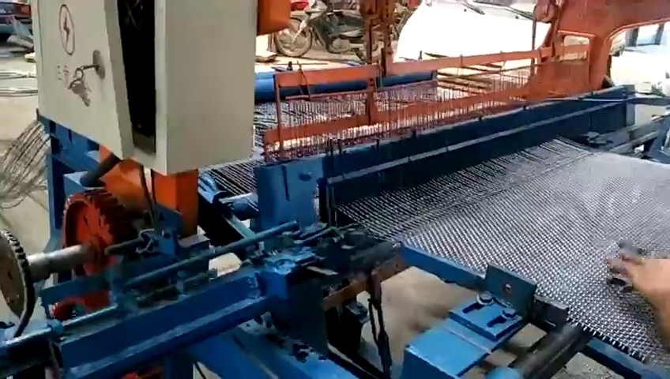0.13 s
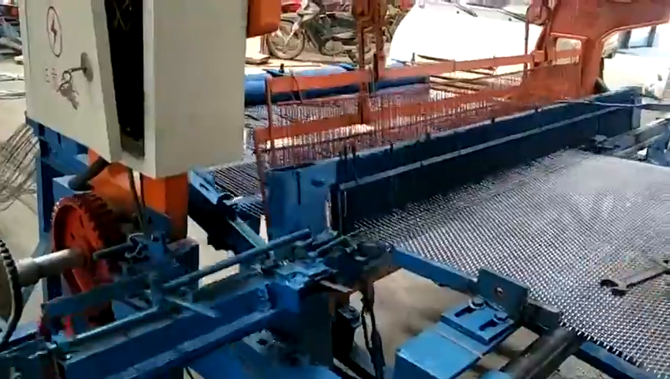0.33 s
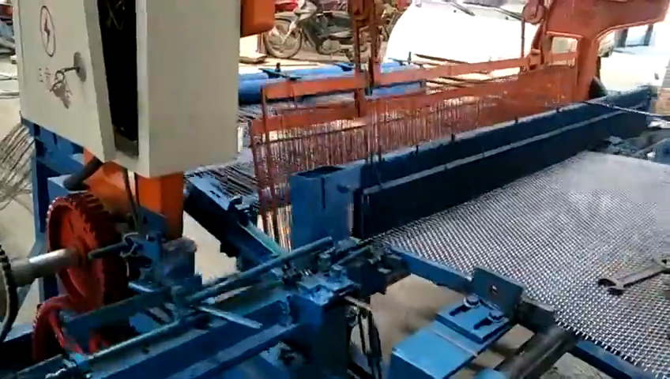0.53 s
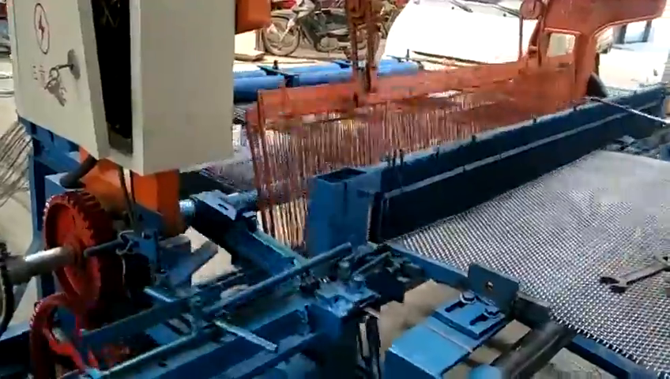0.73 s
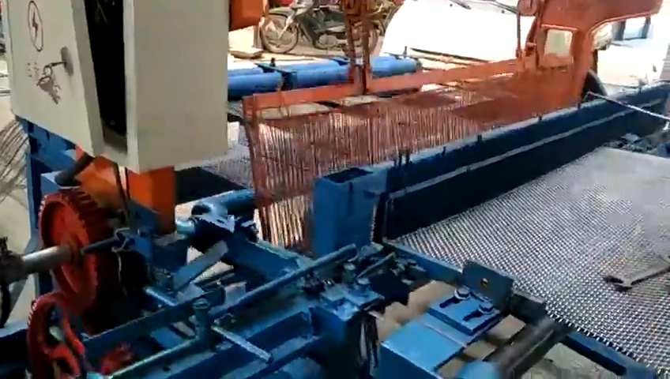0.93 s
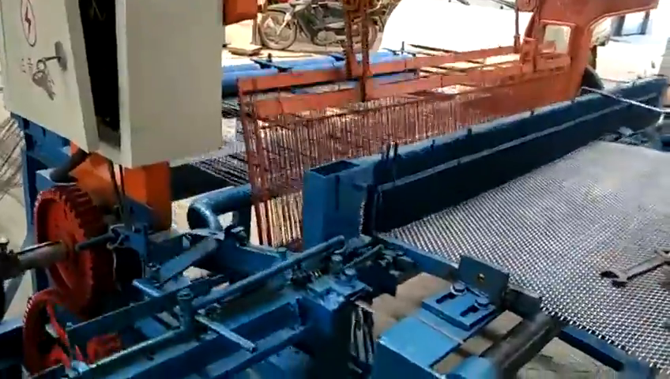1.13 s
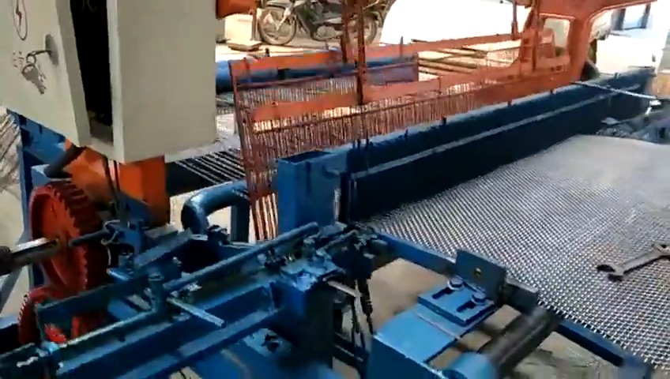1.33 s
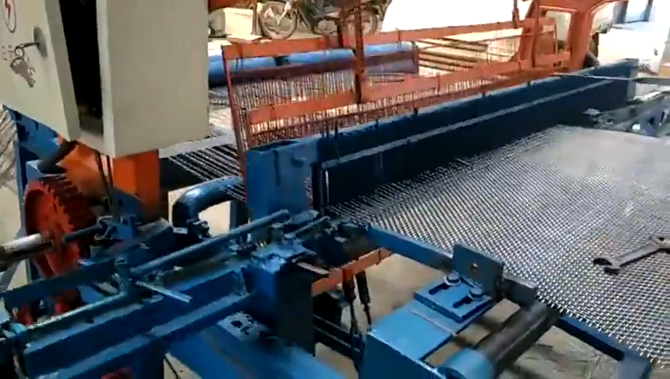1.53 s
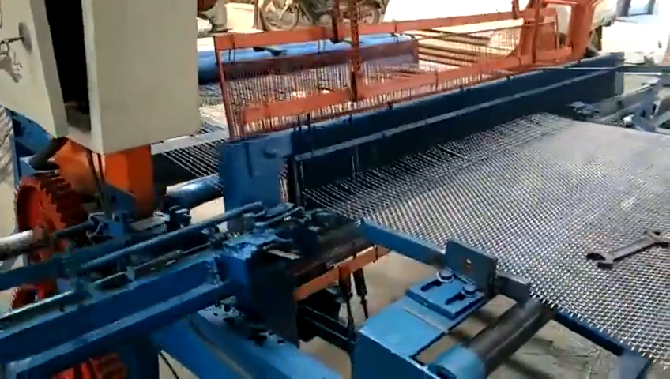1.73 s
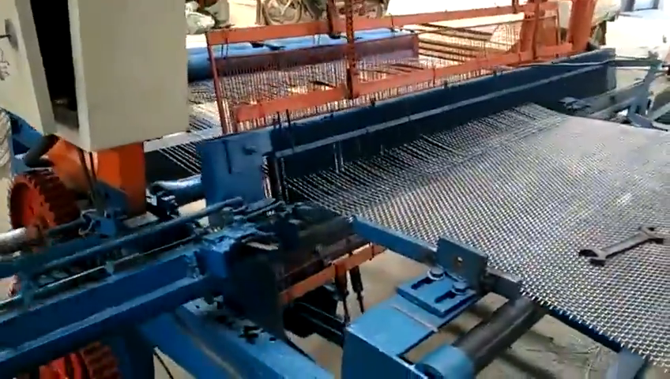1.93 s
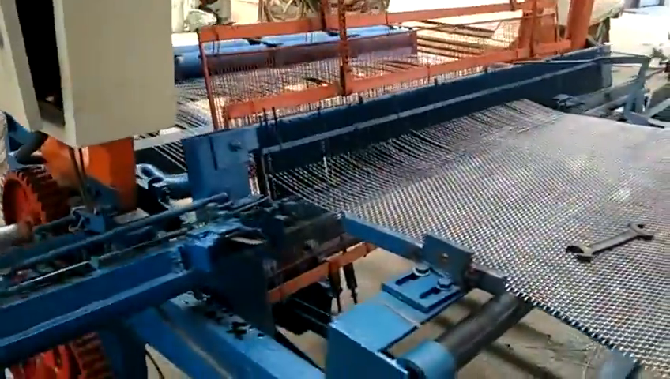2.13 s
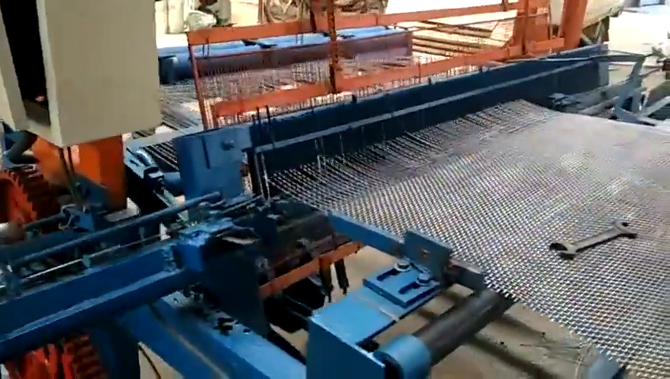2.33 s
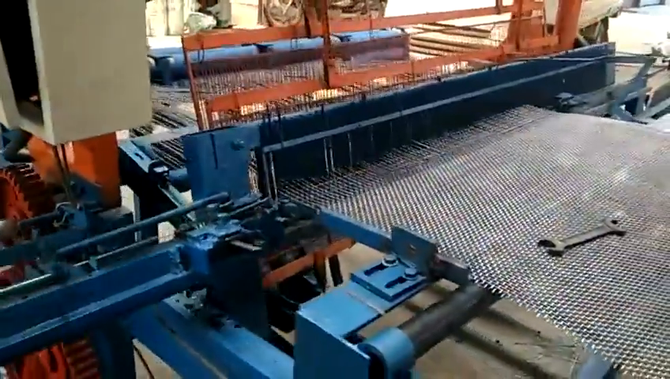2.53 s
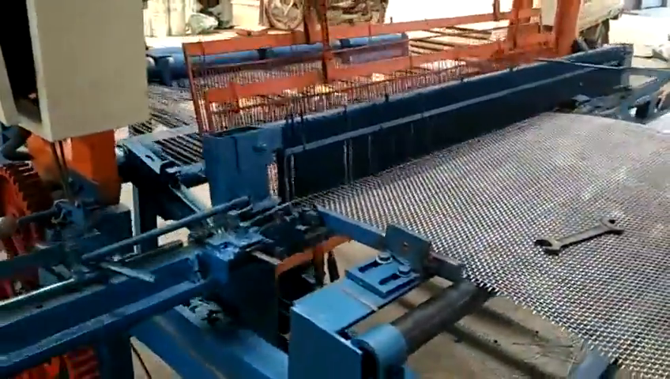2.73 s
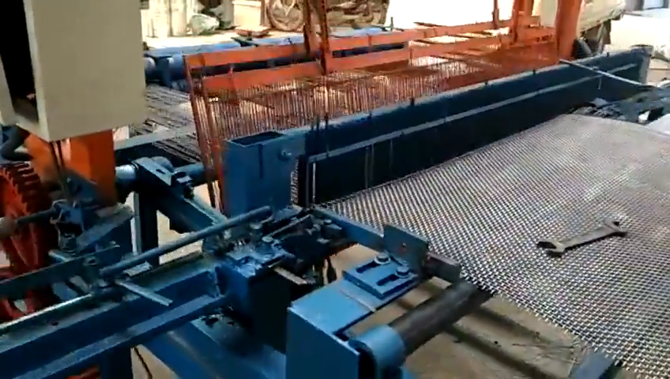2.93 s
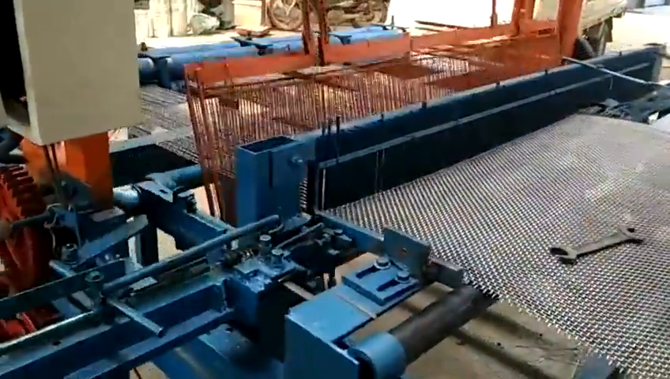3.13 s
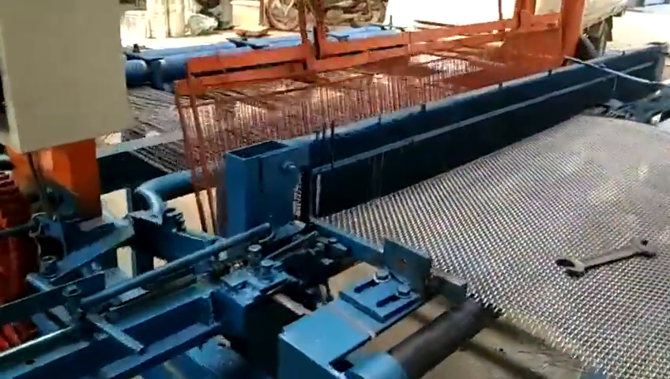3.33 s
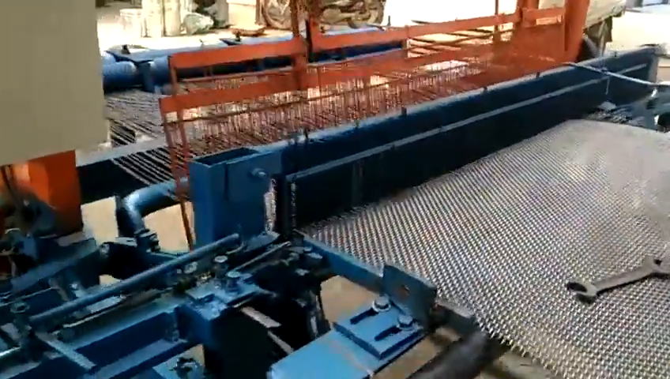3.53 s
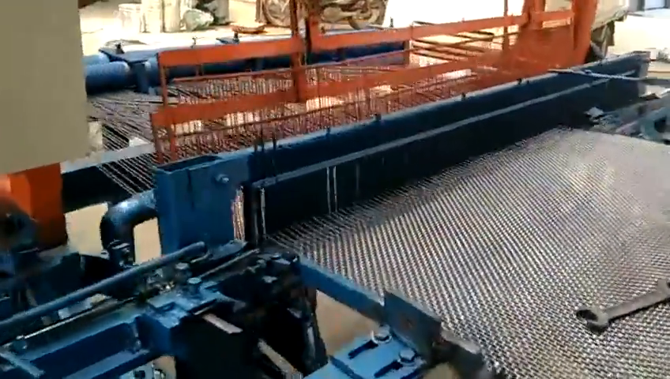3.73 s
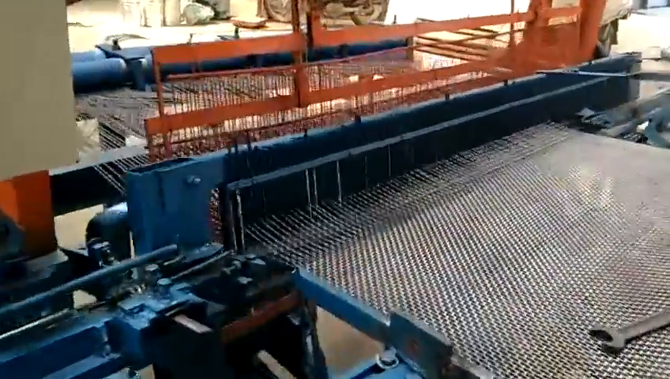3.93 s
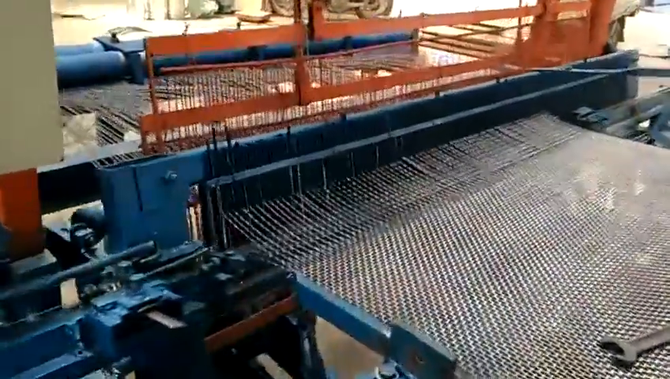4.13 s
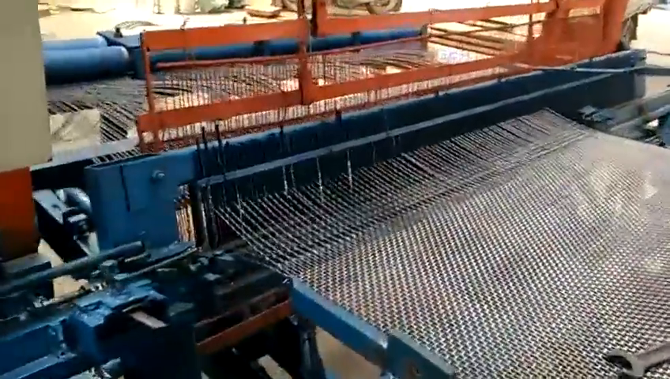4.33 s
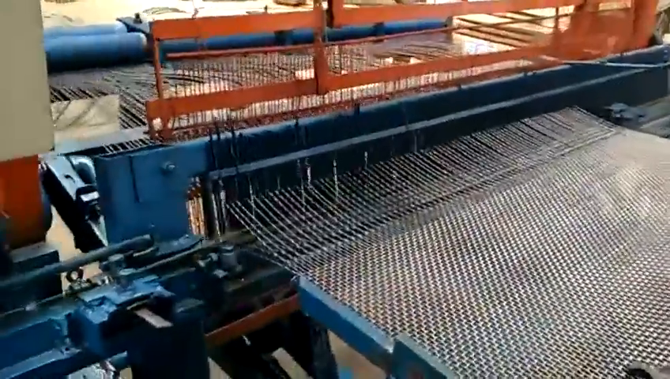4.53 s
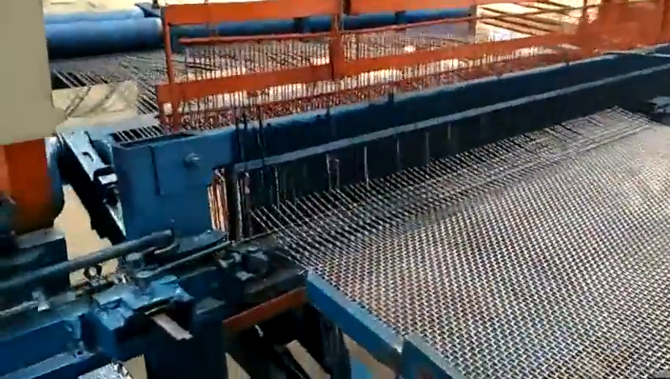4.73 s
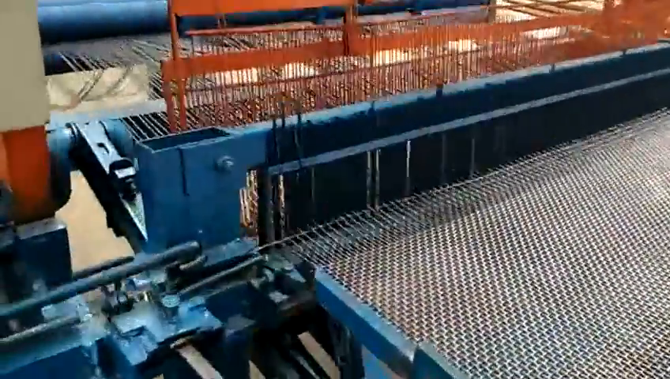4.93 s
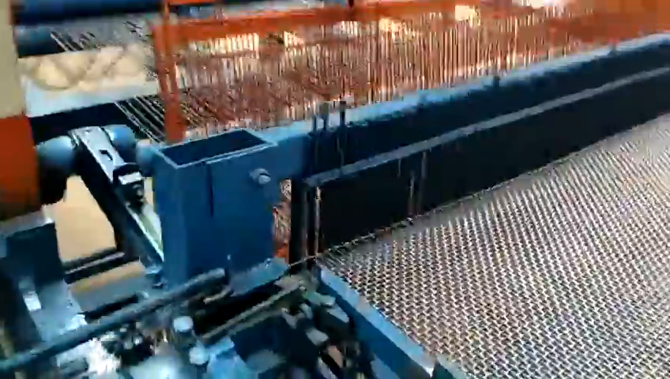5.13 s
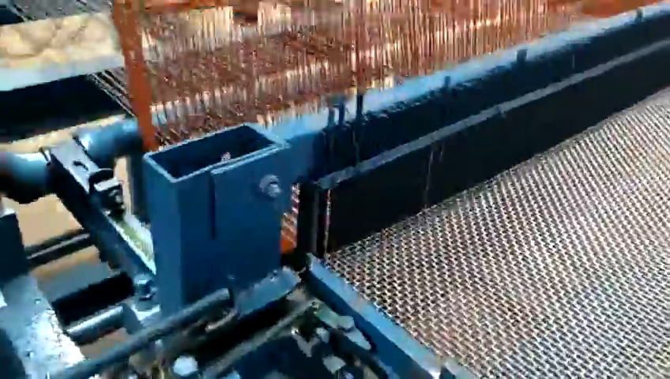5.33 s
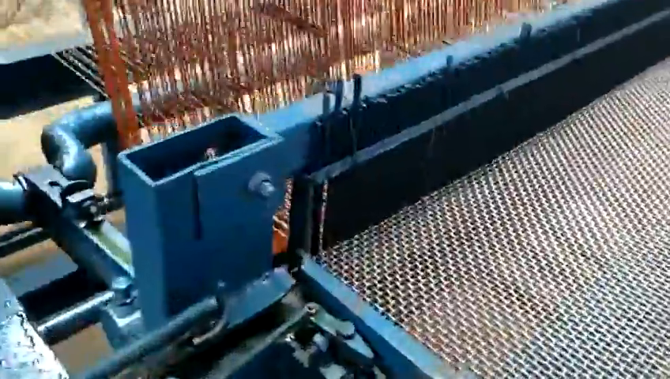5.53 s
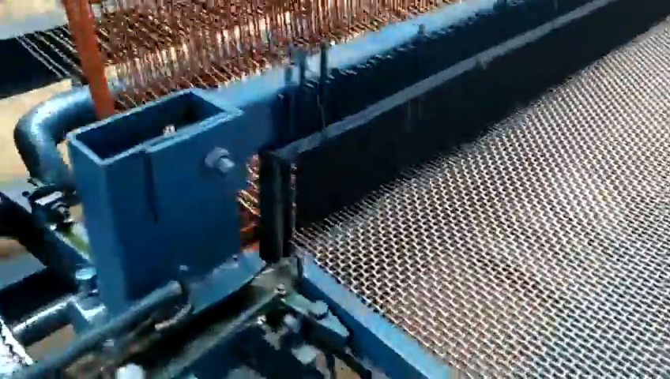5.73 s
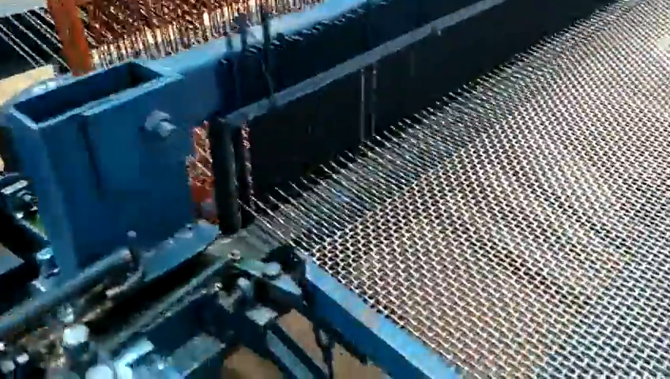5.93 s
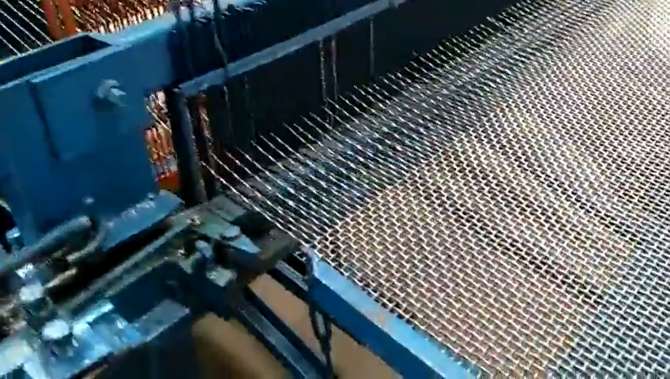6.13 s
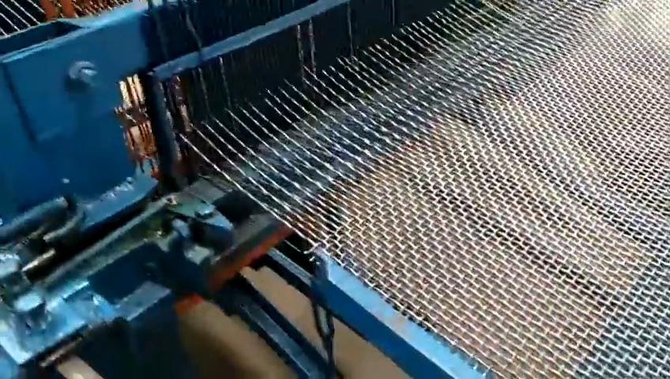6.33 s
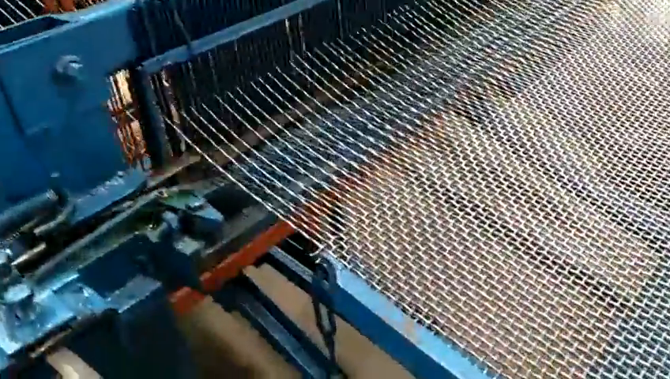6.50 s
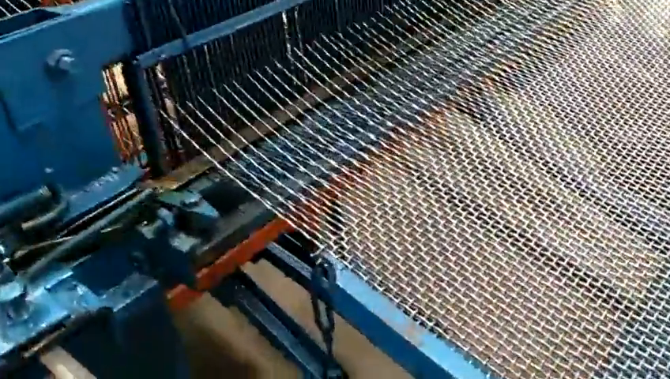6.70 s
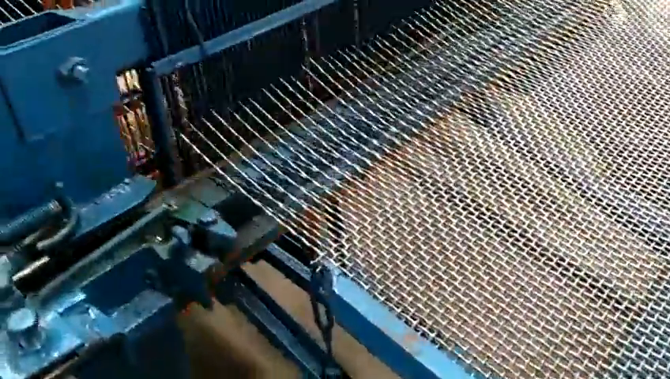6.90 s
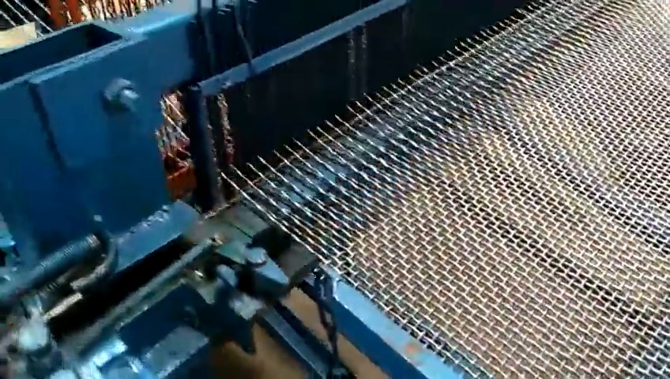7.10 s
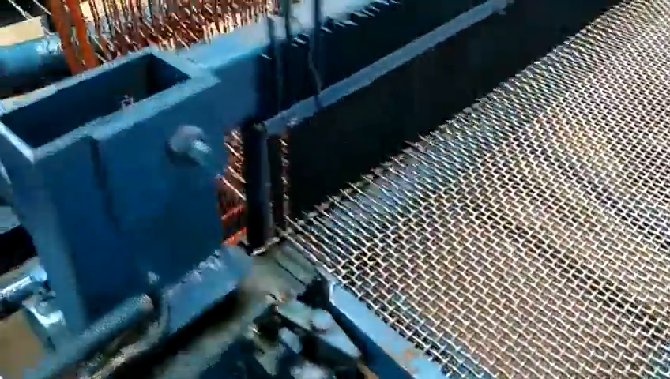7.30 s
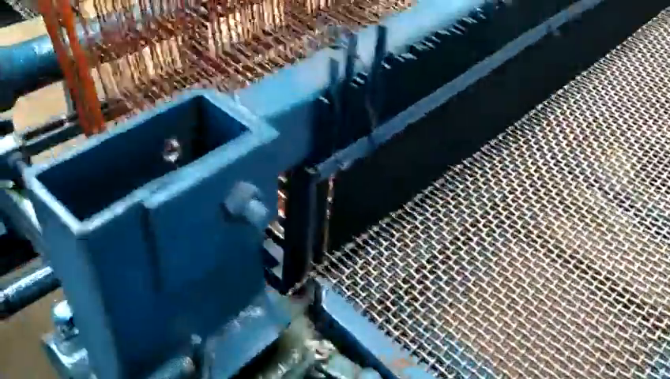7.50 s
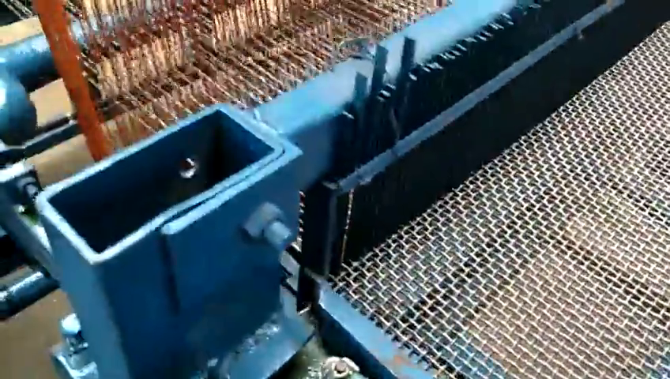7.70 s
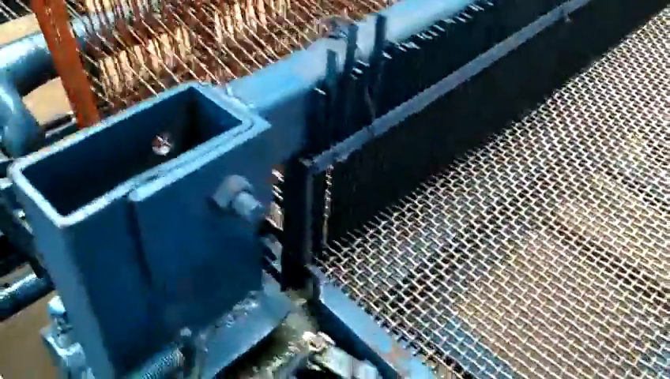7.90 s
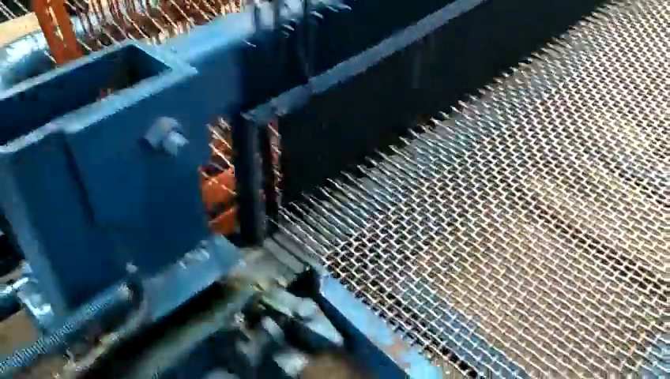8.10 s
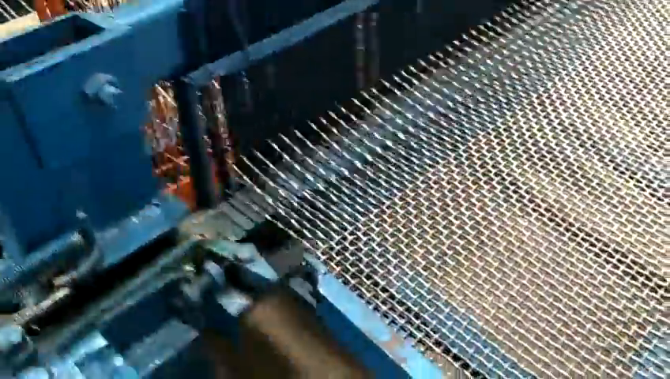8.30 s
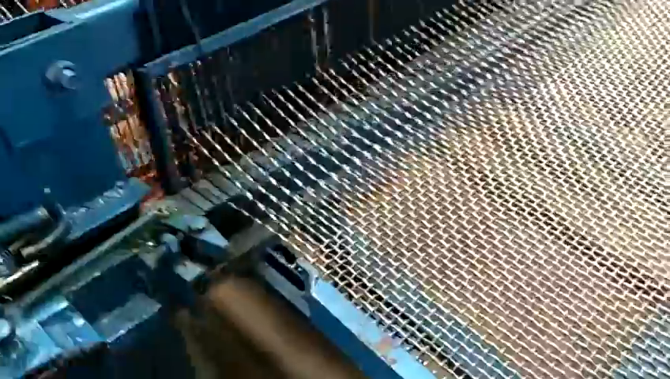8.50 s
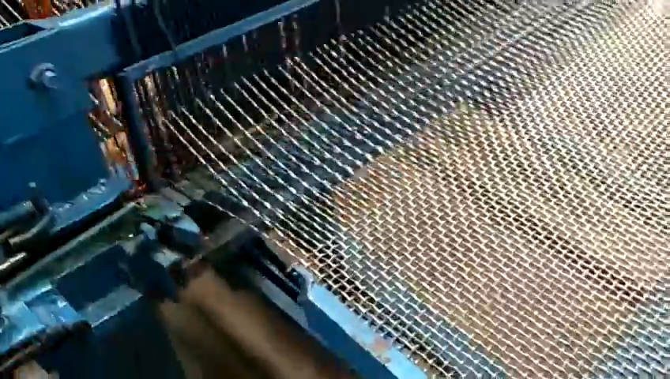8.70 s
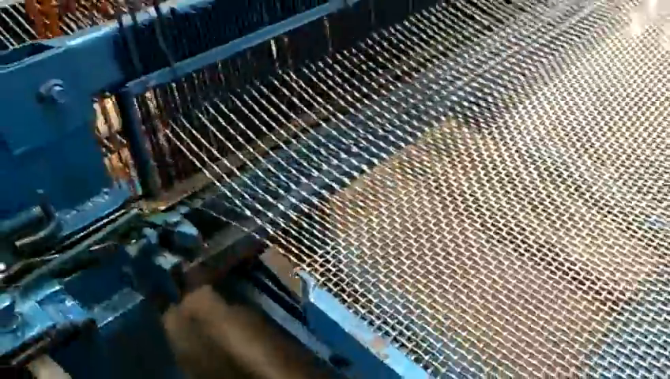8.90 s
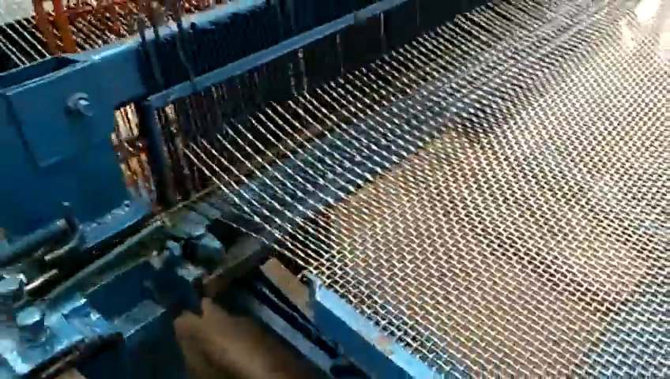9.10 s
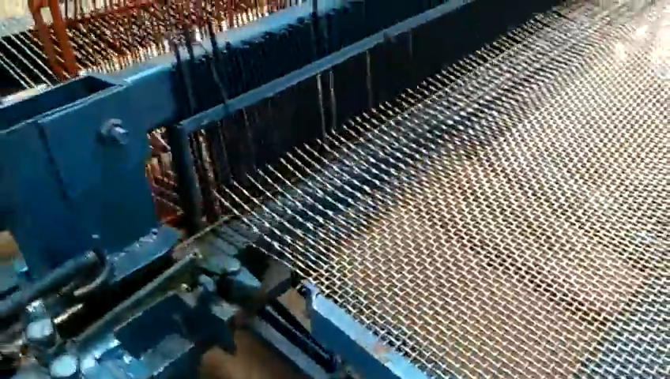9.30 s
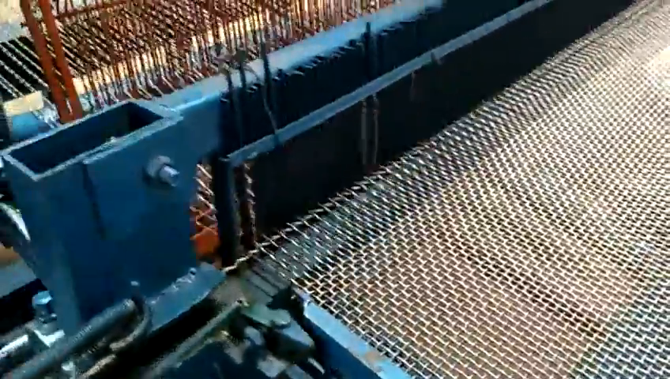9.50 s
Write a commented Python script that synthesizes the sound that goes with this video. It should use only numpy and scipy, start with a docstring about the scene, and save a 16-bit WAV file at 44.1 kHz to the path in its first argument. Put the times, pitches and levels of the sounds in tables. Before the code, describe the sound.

After about 0.7 seconds of silence, a wire-weaving machine bursts in mid-cycle. The carriage whines on its rails, the reed slams and bounces, rods and clamps clack, air hisses, the shear snips, then wire rattles and sings through a tube. The cycle repeats about every 2.25 seconds. Captured closely in stereo in a reverberant workshop, loud enough to overload slightly, over distant machinery and low rumble.

```python
"""Wire mesh loom in a workshop, from close by, on two microphones a hand apart that overload softly near full scale.
After 0.72 s of silence, far machinery, low hums and a deep wind rumble (shaped noise) lie under a carriage whining on
its rails (narrow noise bands). Every 2.25 s the reed slams and bounces, rods and clamps land, cylinders vent and the
shear closes (showers of tiny contacts through resonances); then the feeder pushes a weft wire that rattles and sings
in its tube. Loose bars and the feeder pawl ping (decaying sines), the base thuds, and the hall answers every blow."""
import sys
import numpy as np
from scipy import signal
from scipy.fft import rfft, irfft, next_fast_len
from scipy.io import wavfile
from scipy.ndimage import uniform_filter1d, map_coordinates

SR = 44100
rng = np.random.default_rng(int(sys.argv[2]) if len(sys.argv) > 2 else 0)


def waveform_to_disk(signal):
    """Save audio, clipped to [-1, 1], as 16-bit WAV at the path in sys.argv[1]."""
    frames = np.transpose(np.atleast_2d(signal))
    scaled = np.clip(frames, -1, 1) * 32767
    samples = np.round(scaled).astype(np.int16)
    wavfile.write(sys.argv[1], SR, samples)


N = 421155

# Every level_db is relative: the gain of its layer comes on top.
# place: far machinery of the shop, power density: pitch_hz [Hz], level_db [dB per Hz]
SHOP_SPECTRUM = [(12, -45), (20, -6), (406, -5.5), (567, -10.5), (911, -29), (2480, -4), (3100, -17),
                 (5570, 0.5), (8950, -63), (13200, -16), (15600, -36)]
# low hums and a deep wind rumble that come and go:
# start_s [s], end_s [s], pitch_hz [Hz], width_hz [Hz], level_db [dB]
HUM_AND_RUMBLE_SPANS = [(1.61, 2.6, 373.8, 6.6, -38.5), (1.8, 2.356, 36, 45, -39.5),
                        (3.193, 6.016, 247, 6.7, -45), (3.95, 4.6, 99.4, 8.8, -51),
                        (5.2, 6.9, 103.4, 11, -45.5), (7.343, 8.928, 106, 23, -43),
                        (7.393, 8.108, 249.6, 59, -38)]
# decay of the hall: pitch_hz [Hz], t60_s [s]
HALL_DECAY = [(100, 1), (1000, 0.38), (5000, 0.5), (14000, 0.4)]
# likeness of the two microphones: pitch_hz [Hz], likeness [0 to 1]
MIC_LIKENESS = [(60, 0.96), (300, 0.89), (700, 0.7), (1400, 0.06), (5000, 0.1), (15000, 0.098)]
# runs of the carriage along its rails: start_s [s], end_s [s], lower_db [dB], upper_db [dB]
CARRIAGE_RUNS = [(0.704, 0.883, -23.5, -23), (1.322, 1.55, -31.5, -32), (2.8, 3.1, -24.5, -22),
                 (3.48, 3.812, -22.5, -19.5), (5.055, 5.375, -24.5, -21), (5.736, 6.057, -20.5, -20),
                 (7.376, 7.588, -19, -20), (7.93, 8.262, -24, -20.5)]
# lower tones of the rails: pitch_hz [Hz], width_hz [Hz], level_db [dB]
RAIL_LOWER = [(1750, 500, -16), (2280, 45, -4), (3990, 90, -10), (4930, 40, 0)]
# upper tones of the rails: pitch_hz [Hz], width_hz [Hz], level_db [dB]
RAIL_UPPER = [(5550, 70, 0), (5900, 60, -8)]
# one loom cycle, common to all: into_s [s into the cycle], wire_db [dB], air_db [dB], frame_db [dB]
LOOM_CYCLE = [(.125, -18.5, -29, -28), (.22, -17, -26.5, -30), (.49, -23, -33.5, -30.5),
              (.53, -37, -38, -37), (.665, -32, -43, -30.5), (.765, -18, -32.5, -33.5),
              (1.085, -16.5, -22, -25), (1.255, -20, -28, -27), (1.44, -21, -27, -22.5),
              (1.625, -22, -34.5, -31), (1.805, -21.5, -37.5, -28.5), (1.95, -31.5, -45, -32.5),
              (2.13, -30.5, -55, -34.5), (2.185, -34.5, -55, -42), (2.22, -41, -55, -42.5)]
# how each cycle's wire, air and frame levels rise and fall against the common cycle:
# time_s [s], wire_db [dB], air_db [dB], frame_db [dB]
CYCLE_VARIATION = [(.73, 3, 4.5, 0), (1.05, 4.5, 13, -1), (1.2, -9.5, 9.5, -10), (1.52, -13, 32, -7.5),
                   (1.75, -3, 2.5, 1.5), (2.398, 5.5, 8.5, 2), (3.1, -3, -3.5, -4), (3.6, 3, 1, 3),
                   (4.298, 2, 0.5, 1.5), (5, 2.5, 1, .5), (5.552, 0, 0.5, -2), (6.052, 6, -3, 8),
                   (6.599, -1.5, 7.5, -1.5), (7.5, 1.5, -1.5, 2.5), (8.05, -1, 1.5, -1),
                   (8.3, -13, 0, -1.5), (8.6, 2, 3, 3), (9.498, 0, 0, 1.5)]
# resonances of the reed: pitch_hz [Hz], width_hz [Hz], level_db [dB]
REED_MODES = [(3673, 670, -9), (4525, 710, -5.5), (5220, 510, -0.5), (5960, 1100, -5), (7170, 1670, -14.5)]
# resonances of the frame: pitch_hz [Hz], width_hz [Hz], level_db [dB]
FRAME_MODES = [(372, 237, -14), (893, 318, -0.5), (1337, 1020, -1), (1930, 1097, 0), (2816, 930, -4.5)]
# hiss of the vents, also the treble of a blow: pitch_hz [Hz], level_db [dB per Hz]
AIR_SPECTRUM = [(3820, -35), (6500, -3.5), (8310, -5.5), (8880, -11.5), (9660, -5), (10600, -8),
                (12200, -4.5), (13000, -1.5), (15100, -6.5), (15600, -12)]
# weft pushed through its singing tube as air vents:
# start_s [s], end_s [s], pitch_hz [Hz], width_hz [Hz], song_db [dB], vent_db [dB]
WEFT_FEEDS = [(2.376, 2.687, 5460, 400, -25, -22), (4.607, 4.923, 5220, 258, -13, -16.5),
              (6.84, 7.174, 5640, 613, -15.5, -14.5), (9.106, 9.425, 5530, 614, -16.5, -15)]
# strokes on the guide bar: start_s [s], level_db [dB], lowest_mode_db [dB]
GUIDE_BAR_HITS = [(0.957, -13, -26), (1.6903, -8.5, -23), (1.76, -12, -38), (1.8868, -10.5, -22),
                  (2.044, -11, -24), (2.6758, -19, -28), (3.9322, -11.5, -12.5), (4.0053, -14, -17),
                  (4.106, -10.5, -16), (4.2563, -12.5, -12), (4.952, -14, -31), (4.9988, -18, -11),
                  (5.0633, -14.5, -14.5), (6.2791, -24, -38), (6.323, -15, -32), (6.57, -31, -19),
                  (7.2714, -23, -20.5), (8.7, -18, -17)]
# modes of the guide bar: pitch_hz [Hz], level_db [dB], t60_s [s]
GUIDE_BAR_MODES = [(3850, 0, .09), (7290, -5, .08), (8330, -3, .09), (11590, -14, .08), (13320, 0, .09),
                   (14670, -14, .06)]
# clicks of the feeder pawl: start_s [s], level_db [dB]
PAWL_CLICKS = [(2.785, -15.5), (2.8155, -20), (2.857, -18), (2.9194, -31), (3.0206, -20), (5.0579, -14),
               (5.1033, -15), (5.1843, -14), (5.2654, -10)]
# modes of the pawl: pitch_hz [Hz], level_db [dB], t60_s [s]
PAWL_MODES = [(4460, 1.5, 0.036), (6540, -2, 0.063)]
# thuds of the base in every cycle: into_s [s into the cycle], level_db [dB], t60_s [s]
BASE_THUDS = [(.378, -23.5, .36), (.64, -28.5, .19), (1.472, -21, 1)]
# resonances of the base: pitch_hz [Hz], width_hz [Hz], level_db [dB]
BASE_MODES = [(38.2, 10, -6), (101, 6.5, 1), (130, 46, -6.5), (225, 96, -2), (278, 44, 1), (419, 19, 2.5)]
# knocks on the hollow beam: start_s [s], level_db [dB]
BEAM_KNOCKS = [(1.756, -18.5), (2.663, -21.5), (4.003, -14), (4.92, -14), (6.248, -13.5), (7.167, -16),
               (8.501, -11.5), (8.837, -32), (9.416, -16.5)]
# modes of the hollow beam: pitch_hz [Hz], level_db [dB], t60_s [s]
BEAM_MODES = [(862, -8, 1), (986, 4, 0.076), (1136, 1, 0.12)]
# cylinder rods hitting their stops: start_s [s], level_db [dB]
ROD_STOPS = [(1.6443, -8.5), (2.3328, -14), (3.903, -10.5), (4.5843, -14), (6.1445, -5), (6.791, -20),
             (6.8313, -10), (8.4018, -7), (8.4715, -12), (9.0837, -11)]
# resonances of the stop: pitch_hz [Hz], width_hz [Hz], level_db [dB]
STOP_MODES = [(1415, 250, -2.5), (1970, 260, 4.5), (2520, 250, -2.5), (3250, 65, 4)]
# blows of steel on steel, by kind:
# (frame_db [dB over the blow], treble_db [dB over the blow], t60_s [s]), rows of start_s [s], level_db [dB]
STEEL_BLOWS = { "reed slams": ((-12.5, -14, 0.5), [(.859, 0.5), (3.1108, 1), (5.3632, 0.5), (7.614, 1)]),
               "reed bounces": ((-14.5, -26.5, 0.17), [(.9674, -3), (3.2116, 4), (5.459, -2.5),
               (7.7151, -4.5)]), "rod lands": ((-17.5, -29.5, 0.26), [(1.6682, -3), (3.906, -11),
               (4.573, -7), (6.135, -2), (6.165, -22), (6.8249, -2.5), (8.417, -4.5), (9.047, -3)]),
               "clamp shuts": ((-21, -12, 0.36), [(1.74, 0), (2.3495, -2), (2.381, -23), (3.9915, 0.5),
               (4.5986, -6.5), (6.2357, 0.5), (8.4912, 1), (9.1, -5.5)]),
               "shear closes": ((-9, -13.5, 0.16), [(2.0228, -4), (4.2583, -6), (6.5374, -0.5),
               (8.767, -2.5)]), "wire snaps": ((-19, -14.5, 0.19), [(2.0682, 5), (4.322, 3.5), (6.572, 2),
               (8.821, 1), (8.836, -7.5)]), "shear returns": ((-23, -13.5, 0.038), [(2.138, 2), (4.385, 1),
               (6.6424, 1.5), (8.884, -3.5)]), "feeder stops": ((-23.5, -13.5, 0.11), [(2.6663, -5),
               (4.9154, 2.5), (7.1635, 3), (9.4146, -0.5)]), "dull clank": ((-21, -32, 0.17),
               [(.7217, -10.5), (1.8901, -7), (2.8896, 0.5), (6.4736, -1.5), (7.4, -16), (7.945, -16),
               (7.998, -16), (8.071, -12), (8.18, -3.5)]), "bright clank": ((-15.5, -14.5, 0.17),
               [(.7592, -9), (3.0177, -9.5), (7.83, -9), (8.098, -1.5), (8.2252, -7), (8.7016, -10.5)])}

START_S, TOP_HZ = .7205, 15784  # end of the silent lead-in, upper band limit
CYCLE_S, FIRST_S = 2.2517, 1.645  # length of a loom cycle, start of one of them
SHOP_DB = -35.5
STOP_T60_S = 0.2
CLACK_DB = -8  # free ring of the stop at first contact
THUD_GAIN_DB = 0.4  # the thuds grow by this much a cycle
CRACK, CRACK_T60_S = 0.95, 0.017  # size of a blow's crack beside its shower, and its decay
LOOM_LEFT_DB, RAILS_LEFT_DB = .3, 1.5  # gain of the left microphone, taken from the right one


def amp(db):
    """Decibels to an amplitude factor."""
    return 10 ** (np.asarray(db) / 20)


def unit(x):
    """Scaled to an RMS of one."""
    return x / np.sqrt(np.mean(x ** 2) + 1e-20)


def along(points, hz):
    """Reads (Hz, value) points on a log frequency axis."""
    f, v = np.transpose(points)
    return np.interp(np.log(hz + 1), np.log(f + 1), v)


def curves(rows):
    """One value per sample for each column after the time."""
    s, *cols = np.transpose(rows)
    return [np.interp(np.arange(N) / SR, s, c) for c in cols]


def wobble(rate):
    """A smooth random curve with rate knots a second."""
    knots = rng.standard_normal(int(N * rate / SR) + 4)
    return map_coordinates(knots, [np.arange(N) * rate / SR])


def span(start, end, fade):
    """1 between two times, with soft edges inside them."""
    t = np.arange(N) / SR
    return np.clip(np.minimum(t - start, end - t) / fade, 0, 1)


def filtered(x, response):
    """x shaped by a complex response of frequency."""
    m = next_fast_len(N + SR // 2)
    return irfft(rfft(x, m) * response(np.fft.rfftfreq(m, 1 / SR)), m)[..., :N]


def resonances(modes):
    """Causal response of damped resonances, summed with alternating sign."""
    def response(f):
        total = 0
        for k, (c, w, db) in enumerate(modes):
            total = total + (-1) ** k * amp(db) * 1j * f * w / (c * c - f * f + 1j * f * w)
        return total
    return response


def alike(mid, side):
    """Close microphones: left and right share the bass and differ in the treble."""
    def mid_and_side(hz):
        turn = np.arccos(np.clip(along(MIC_LIKENESS, hz), -1, 1)) / 2
        return np.array([np.cos(turn), np.sin(turn)])
    mid, side = filtered(np.array([mid, side]), mid_and_side)
    return np.array([mid + side, mid - side])


def contacts(rate, spread_db, ring_db):
    """Tiny uneven contacts, rate a second; narrow bands flare briefly at random, as each part rings."""
    size = amp(spread_db * np.minimum(rng.exponential(size=N), 3))
    size = size * (rng.random(N) < rate / SR)
    size = signal.lfilter([1], [1, -.9], size)  # each contact dies within a millisecond or so
    z = signal.stft(alike(*size * rng.standard_normal((2, N))), nperseg=512)[2]
    ringing = uniform_filter1d(rng.standard_normal(z.shape[1:]), size=2, axis=0)  # neighbouring pitches
    ringing = uniform_filter1d(ringing, size=5, axis=1)  # and moments flare together
    return unit(signal.istft(z * amp(ring_db * unit(ringing)), nperseg=512)[1][:, :N])


def far_machinery(noise):
    """Steady distant machinery: noise with the spectrum of the shop."""
    return amp(SHOP_DB) * unit(filtered(noise, lambda hz: amp(along(SHOP_SPECTRUM, hz))))


def hums_and_wind_rumble(noise):
    """Low wavering hums and a deep wind rumble: noise passed twice through one resonance each."""
    noise = noise * amp(0.67 * wobble(4.1))
    out = np.zeros((2, N))
    for start, end, hz, width_hz, db in HUM_AND_RUMBLE_SPANS:
        mode = resonances([(hz, width_hz, 0)])
        band = filtered(noise, lambda f: mode(f) ** 2)
        out += amp(db) * span(start, end, fade=0.061) * unit(band)
    return out


def workshop():
    """The place behind the loom: far machinery, hums and wind rumble."""
    noise = alike(*rng.standard_normal((2, N)))
    return far_machinery(noise) + hums_and_wind_rumble(noise[:, ::-1])  # reversed, so they do not move together


def hall(x):
    """Convolves with a noise tail whose pitches die at their own speeds; its bass is alike in both microphones."""
    noise = alike(*rng.standard_normal((2, N)))[:, :SR]
    hz, t, z = signal.stft(noise, SR, nperseg=256)
    decay = amp(-60 * t / along(HALL_DECAY, hz)[:, None])
    tail = signal.istft(z * decay, SR, nperseg=256)[1]
    return signal.fftconvolve(x, tail / np.linalg.norm(tail[0]), axes=1)[:, :N]


def carriage():
    """Bearings stick and slip on the rails: uneven noise rubs narrow rail tones for each short run."""
    rub = alike(*rng.standard_normal((2, N)))
    lower = unit(amp(1.03 * wobble(35)) * filtered(rub, resonances(RAIL_LOWER)))
    upper = unit(amp(1.03 * wobble(35)) * filtered(rub, resonances(RAIL_UPPER)))
    out = np.zeros((2, N))
    for start, end, lower_db, upper_db in CARRIAGE_RUNS:
        out += span(start, end, fade=0.028) * (amp(lower_db) * lower + amp(upper_db) * upper)
    return out


def work():
    """Levels of wires, air and frame: the common cycle, and how each cycle rises and falls against it."""
    into, *levels = np.transpose(LOOM_CYCLE)
    t = np.arange(N) / SR - FIRST_S
    variations = curves(CYCLE_VARIATION)
    return [np.interp(t, into, db, period=CYCLE_S) + over_db for db, over_db in zip(levels, variations)]


def vents(rattle):
    """Escaping air: dense tiny bursts with a hiss spectrum; the blast also sets the guide bar singing."""
    jets = unit(filtered(contacts(9800, spread_db=3.0, ring_db=4.5), lambda hz: amp(along(AIR_SPECTRUM, hz))))
    bar = resonances([(hz, 70, db) for hz, db, _ in GUIDE_BAR_MODES[1:]])
    jets += amp(-15.0) * unit(filtered(rattle, bar))
    return jets * amp([[-1.5], [1.5]])  # the vents sit to the right


def feeding(rattle, jets):
    """The weft scrapes through its guide tube, whose resonance sings, while the cylinder vents."""
    judder = amp(0.26 * wobble(120))  # the crimps of the wire catch
    out = np.zeros((2, N))
    for start, end, hz, width_hz, song_db, vent_db in WEFT_FEEDS:
        tube = resonances([(hz, width_hz, 0)])
        song = amp(song_db) * judder * unit(filtered(rattle, lambda f: tube(f) ** 2))
        out += span(start, end, fade=0.022) * (song + amp(vent_db) * jets)
    return out


def weaving():
    """Wires rattle in the reed, cylinders vent, the frame shakes along and the weft is fed."""
    wire_db, air_db, frame_db = work()
    rattle, chatter = contacts(4000, spread_db=2.3, ring_db=4.5), wobble(30)
    jets = vents(rattle)
    wires = amp(wire_db - 1.65 + 2.8 * chatter) * unit(filtered(rattle, resonances(REED_MODES)))
    air = amp(air_db - 2.5 + 0.53 * chatter) * jets
    # reversed contacts, so that the frame does not copy the wires
    frame = amp(frame_db + 1.04) * unit(filtered(rattle[:, ::-1], resonances(FRAME_MODES)))
    return wires + air + frame + feeding(rattle, jets)


def rings(hits, modes, gain_db, held, rough):
    """Struck steel: modes waver and hold for held s, then die; level and phase differ at each microphone."""
    out, t = np.zeros((2, N + SR)), np.arange(SR // 3) / SR
    attack = 1 - np.exp(-t / 0.00079)
    for s, db, *lowest_db in hits:
        for k, (hz, mode_db, t60) in enumerate(modes):
            draw = rng.standard_normal(40)
            base_db = lowest_db[0] + 1.0 if k == 0 and lowest_db else db
            waver = rough * np.interp(t, np.linspace(0, .2, 36), draw[4:])
            fade_db = -60 * np.maximum(t - held, 0) / t60
            uneven_db = 4.1 * draw[:2, None] + 0.83 * waver
            size = amp(base_db + gain_db + mode_db + uneven_db + fade_db) * attack
            offset = np.array([[0], [draw[3] * min(hz / 1500, 1)]])  # right microphone, up to full from 1500 Hz
            phase = 2 * np.pi * hz * (1 + 0.0044 * draw[2]) * t + waver + offset
            out[:, round(s * SR):round(s * SR) + len(t)] += size * np.sin(phase)
    return out[:, :N]


def knocks(hits, modes, gain_db, rise, click):
    """A heavy blow shakes a damped part: a click, then a noise rumble in its resonances."""
    level, t = np.zeros(N + SR), np.arange(SR) / SR
    for s, db, t60 in hits:
        shape = np.minimum(t / rise, 1) * (amp(-60 * t / t60) + click * amp(-60 * t / 0.0054))
        level[round(s * SR):round(s * SR) + SR] += amp(db + gain_db) * shape
    return level[:N] * unit(filtered(alike(*rng.standard_normal((2, N))), resonances(modes)))


def loose_steel():
    """The struck guide bar and the clicking feeder pawl ring in their modes."""
    bar = rings(GUIDE_BAR_HITS, GUIDE_BAR_MODES, gain_db=-2.0, held=0.016, rough=1.0)
    return bar + rings(PAWL_CLICKS, PAWL_MODES, gain_db=1.5, held=0.011, rough=0.16)


def base_thuds():
    """The heavy base rumbles at fixed points of every cycle, a little louder each time."""
    thuds = []
    for k in range(-1, 4):
        for into, db, t60 in BASE_THUDS:
            s = FIRST_S + k * CYCLE_S + into
            if START_S < s < N / SR:
                thuds.append((s, db + THUD_GAIN_DB * (k - 1), t60))
    return knocks(thuds, BASE_MODES, gain_db=-4, rise=0.0014, click=.1)


def hollow_beam():
    """The knocked beam rings in a few rough, wavering modes."""
    return rings(BEAM_KNOCKS, BEAM_MODES, gain_db=-5.0, held=0.0097, rough=2.04)


def rod_stops():
    """A cylinder's rod hits its stop: a free clack and a damped rumble in the same resonances."""
    clack = [(hz, db, np.log(1000) / (np.pi * width_hz)) for hz, width_hz, db in STOP_MODES]  # width to t60
    stops = [(s, db, STOP_T60_S) for s, db in ROD_STOPS]
    ring = rings(ROD_STOPS, clack, gain_db=CLACK_DB, held=0.0018, rough=0.17)
    return ring + knocks(stops, STOP_MODES, gain_db=-3.5, rise=0.0024, click=0.45)


def blows():
    """Steel on steel: each blow is a crack and a dying shower of contacts through reed, frame and treble."""
    t = np.arange(SR // 2) / SR
    drive = np.zeros((3, N + SR))  # reed, frame, treble
    for (frame_db, treble_db, t60), hits in STEEL_BLOWS.values():
        t60s = np.clip([[t60], [1.205 * t60], [1.21 * t60]], .02, 1)
        shower = amp(-60 * t / t60s) * (1 - np.exp(-t / 0.0061))
        shower += CRACK * amp(-60 * t / CRACK_T60_S)
        for s, db in hits:
            layer_db = db + np.array([[-8.5], [frame_db], [treble_db]])
            drive[:, round(s * SR):round(s * SR) + len(t)] += amp(layer_db) * shower
    shake = contacts(4000, spread_db=-3.0, ring_db=5.5)
    colours = resonances(REED_MODES), resonances(FRAME_MODES), lambda hz: amp(along(AIR_SPECTRUM, hz))
    hz = np.fft.rfftfreq(4096, 1 / SR)
    out = np.zeros((2, N))
    for k, (level, colour) in enumerate(zip(drive[:, :N], colours)):
        loudness = np.sqrt(np.mean(np.abs(colour(hz)) ** 2))
        own_shake = np.roll(shake, SR * k, axis=1)  # a second apart, so the layers differ
        out += filtered(level * own_shake, colour) / loudness
    return out


def microphone_spacing(x):
    """Treble reaches the left microphone first, by up to 0.26 ms."""
    def shift(hz):
        lag_s = 0.000262 * hz ** 2 / (hz ** 2 + 900 ** 2)
        return np.exp(1j * np.pi * hz * lag_s * np.array([[1], [-1]]))  # half the lag each way
    return filtered(x, shift)


def scene():
    """The loom with its echoes, in front of the workshop, at two spaced microphones."""
    rails = carriage() * amp([[RAILS_LEFT_DB], [-RAILS_LEFT_DB]])
    small = loose_steel()
    heavy = base_thuds() + hollow_beam() + rod_stops() + blows()
    echoes = hall(amp(-5) * heavy + amp(-5.0) * small)
    loom = rails + weaving() + small + heavy + echoes
    loom = loom * amp([[LOOM_LEFT_DB], [-LOOM_LEFT_DB]])
    return microphone_spacing(workshop() + loom)


def record(dry):
    """Silent lead-in, soft overload near full scale, band limit."""
    x = dry * (np.arange(N) >= START_S * SR)
    x = x / (1 + np.abs(x / .97) ** 6) ** (1 / 6)
    return filtered(x, lambda hz: hz < TOP_HZ)


dry = scene()
out = record(dry)
waveform_to_disk(out)
```